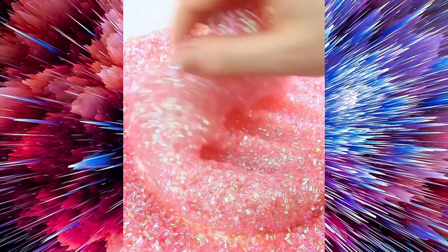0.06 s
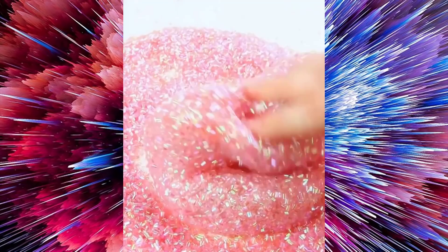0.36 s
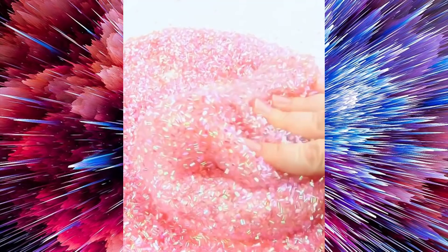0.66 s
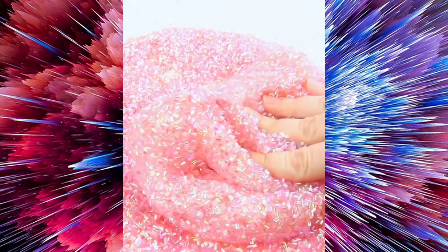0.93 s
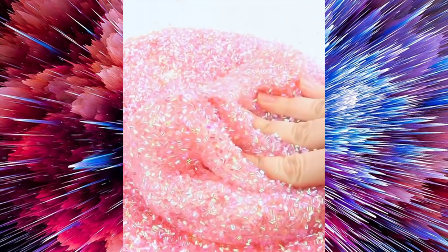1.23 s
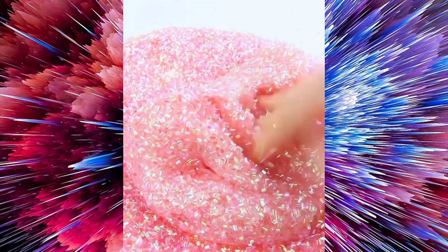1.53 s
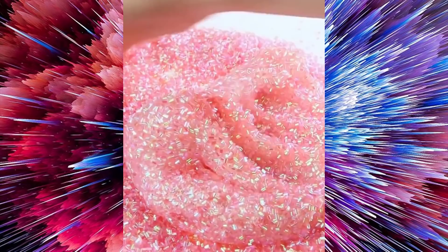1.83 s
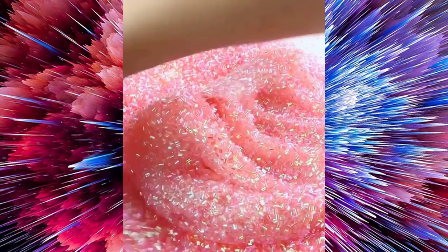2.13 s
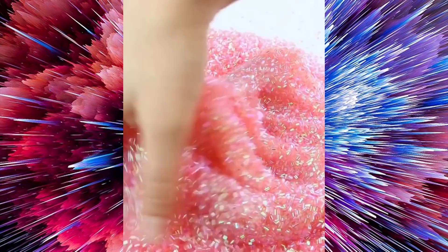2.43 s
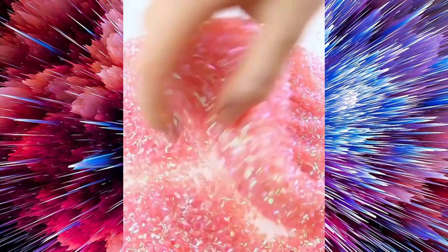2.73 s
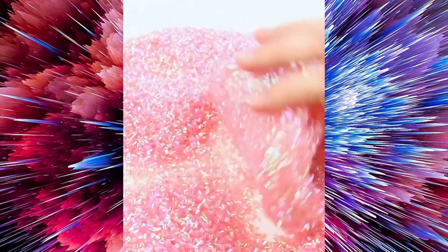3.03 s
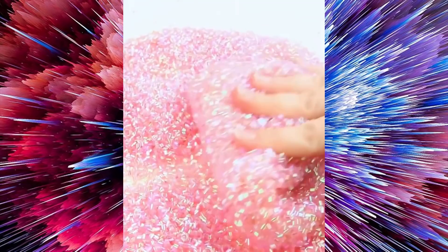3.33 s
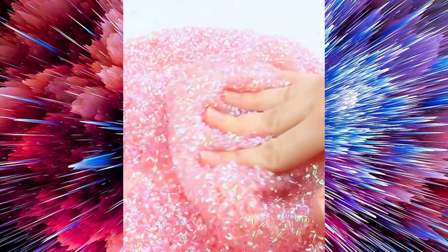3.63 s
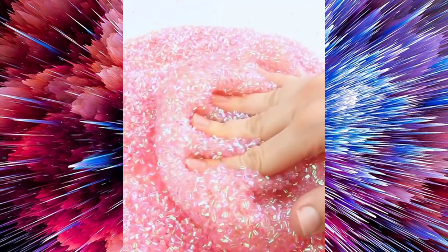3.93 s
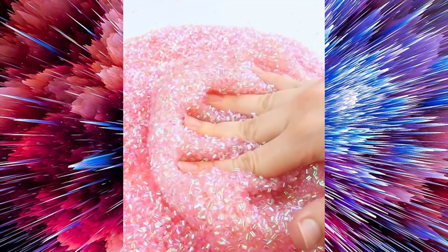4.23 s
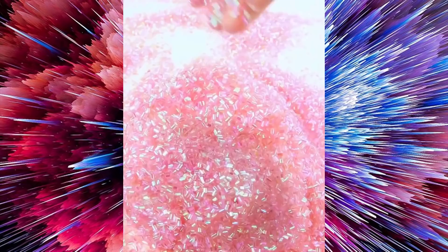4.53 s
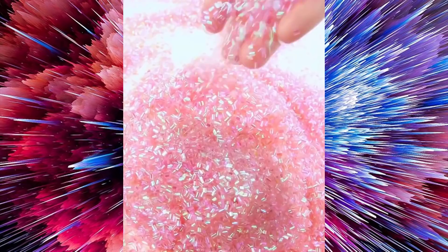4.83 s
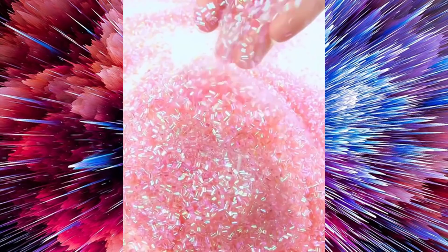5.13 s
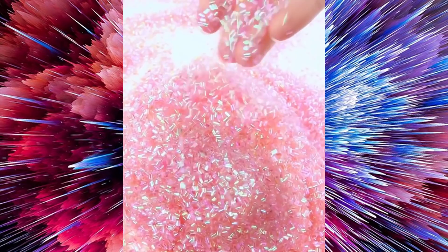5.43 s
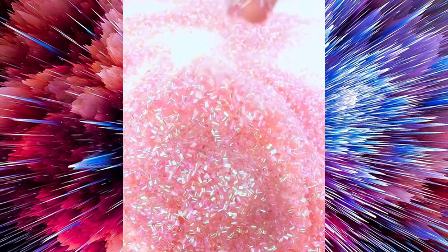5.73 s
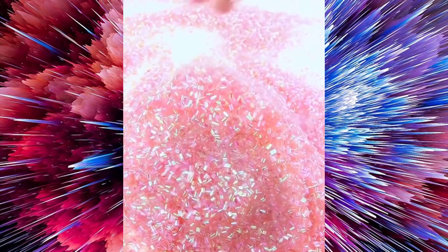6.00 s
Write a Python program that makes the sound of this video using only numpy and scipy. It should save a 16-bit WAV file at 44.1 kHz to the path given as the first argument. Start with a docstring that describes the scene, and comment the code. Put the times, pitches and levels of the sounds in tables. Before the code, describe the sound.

Close, dry stereo sound of slime being kneaded by hand. Countless tiny bubbles burst in a hissing crackle that rises and relaxes with each press, with one sharp snap standing out early on. Short sticky pulls and small wet pops come between the squeezes. After a soft, dull bump on the table, the fizz drops as strands stretch and tear, ending with another faint bump.

```python
"""Kneading glittery slime

A hand presses, folds and lifts slime close to a stereo microphone. Countless tiny air cells
tear open in a fizz, while larger ones crunch and squelch under the fingers. Thin strands rasp,
single films snap, air pockets pop, and the mass twice bumps softly on the table."""
import sys
import numpy as np
from scipy import signal
from scipy.fft import rfft, irfft, next_fast_len
from scipy.io import wavfile
from scipy.ndimage import uniform_filter1d, map_coordinates

SR = 44100
rng = np.random.default_rng(int(sys.argv[2]) if len(sys.argv) > 2 else 0)


def store_pcm(level_fs):
    """Save levels as 16-bit WAV."""
    pcm = np.round(np.clip(level_fs, -1, 1) * 32767).astype(np.int16)
    wavfile.write(sys.argv[1], SR, np.atleast_2d(pcm).T)


N = 271656


def amp(db):
    """Turn decibels into a gain to multiply by."""
    return 10 ** (np.asarray(db) / 20)


def unit(x):
    """Scale x to an average strength (rms) of 1."""
    return x / np.sqrt(np.mean(x ** 2) + 1e-20)


def wobble(rate):
    """A smooth curve through `rate` random values a second."""
    return map_coordinates(rng.standard_normal(int(N * rate / SR) + 4), [np.arange(N) * rate / SR])


def stereo_noise(size, shared=1, separate=0.5):
    """White noise: one part is the same in both ears, the other is each ear's own."""
    return shared * rng.standard_normal(size) + separate * rng.standard_normal((2, size))


def filtered(x, response):
    """Multiply each frequency in x by response(frequency)."""
    size = x.shape[-1]
    padded = next_fast_len(size + SR // 4)
    return irfft(rfft(x, padded) * response(np.fft.rfftfreq(padded, 1 / SR)), padded)[..., :size]


def coloured(x, spectrum):
    """Shape the tone of x with (frequency [Hz], level [dB]) points, then scale it to strength 1."""
    hz, db = np.transpose(spectrum)
    return unit(filtered(x, lambda f: amp(np.interp(np.log(f + 1), np.log(hz + 1), db))))


def resonance(hz, centre, width):
    """A filter curve that favours the frequencies near its centre."""
    return 1j * hz * width / (centre ** 2 - hz ** 2 + 1j * hz * width)


def ringing(t, hz, t60):
    """A tone that builds up over its first cycle and fades by 60 dB in t60 seconds."""
    return np.cos(2 * np.pi * hz * t) * (1 - np.exp(-2 * hz * t)) * amp(-60 * t / t60)


def panned(balance_db):
    """Left and right gains; a positive balance is louder on the left."""
    return amp(np.array([[.5], [-.5]]) * balance_db)


def add(track, s, sound):
    """Mix a stereo sound into the track at s seconds."""
    start = int(np.clip(round(s * SR), 0, N - 1))
    track[:, start:start + sound.shape[1]] += sound[:, :N - start]


def held(start, end, release_db_per_s=191):
    """Gain of a touch: the fingers quickly take hold, stay, then let go."""
    t = np.arange(N) / SR
    attack_db_per_s = 442
    drop_db = attack_db_per_s * np.maximum(start - t, 0) + release_db_per_s * np.maximum(t - end, 0)
    return amp(-np.minimum(drop_db, 100))


def patchy(x, depth_db):
    """Narrow peaks and dips come and go, so the tone keeps shifting."""
    spectra = signal.stft(x, nperseg=1024)[2]
    patches = uniform_filter1d(rng.standard_normal(spectra.shape[1:]), size=3, axis=0)
    patches = uniform_filter1d(patches, size=7, axis=1)
    swing = np.minimum(unit(patches), 1)  # peaks stay mild, so nothing whistles
    return unit(signal.istft(spectra * amp(depth_db * swing), nperseg=1024)[1][:, :N])


def gliding(x, ratios, drift=0.05):
    """Bend the pitch of x along (time [s], pitch [ratio]) points, with a little random drift."""
    speed = np.interp(np.arange(N) / SR, *np.transpose(ratios)) * np.exp(drift * wobble(9))
    return np.array([map_coordinates(side, [np.cumsum(speed)], order=1, mode="mirror") for side in x])


def echoes(x, t60):
    """A short blur of reflections whose pattern keeps changing as the hand moves."""
    hop = SR // 25
    t = np.arange(int(np.clip(t60, .002, .1) * SR)) / SR
    track = np.zeros((2, N))
    for start in range(0, N, hop):
        tail = rng.standard_normal((2, SR // 10))[:, :len(t)] * amp(-60 * t / t60)
        tail /= np.linalg.norm(tail, axis=1, keepdims=True)
        add(track, start / SR, signal.fftconvolve(x[:, start:start + hop], tail, axes=1))
    return track


def cells(spectrum, rate, spread_db, alike, t60):
    """About `rate` air cells burst each second; slime and hand briefly scatter their sound."""
    happens = rng.random(N) < rate / SR
    sizes = happens * amp(spread_db * np.minimum(rng.standard_normal(N), 2.5))
    bursts = sizes * stereo_noise(N, shared=np.sqrt(alike), separate=np.sqrt(1 - alike))
    return coloured(bursts + .5 * echoes(bursts, t60), spectrum)


def room_noise():
    """Steady faint noise, largely alike in both ears."""
    # the tone of the quiet room: (frequency [Hz], level [dB])
    room_tone = [(25, -22), (75, -23), (135, 0.5), (250, -2), (400, 0.5), (650, -1.5), (1100, -3),
                 (2000, -13), (5000, -16), (13000, -4)]
    return amp(-70.5) * coloured(stereo_noise(N), room_tone)


def table_rumble():
    """The hand shifts its weight and the table rumbles faintly."""
    # shoves that swell and fade: (middle [s], length [s], level [dB])
    shoves = [(0.06, 0.087, -80), (0.665, 0.06, -85), (1.028, 0.18, -82), (1.158, 0.065, -83),
              (1.626, 0.23, -81), (4.282, 0.11, -79)]
    t = np.arange(N) / SR
    force = sum(amp(db) * np.exp(-(2 * (t - s) / length) ** 2) for s, length, db in shoves)
    return force * coloured(stereo_noise(N), [(25, 0), (100, -7.5), (250, -8), (1000, -60)])


def finger_drag():
    """A buried finger rubs through the slime, low and muffled."""
    # the tone of the rubbing: (frequency [Hz], level [dB])
    rub_tone = [(120, -27), (260, -4.5), (450, -2.5), (620, -6), (900, 1), (1300, -5), (3000, -27)]
    # strokes deep in the mass: (start [s], end [s], level [dB])
    drags = [(0.0, 0.13, -70), (0.604, 0.79, -75), (1.603, 1.723, -67), (2.175, 2.737, -69.5),
             (5.18, 5.357, -74), (5.814, 5.876, -74)]
    force = sum(amp(db) * held(start, end) for start, end, db in drags)
    return force * coloured(stereo_noise(N), rub_tone)


def table_bumps():
    """The soft mass lands with a dull knock and a low puff of air."""
    # landings on the table: (time [s], relative level [dB])
    landings = [(4.56, -47.5), (6.145, -47)]
    # the tones in the knock: (pitch [Hz], relative level [dB], fade time [s])
    knock_tones = [(55, -9, .04), (111, -0.5, 0.05), (186, -1, 0.043), (343, -1.5, 0.041), (405, -2, 0.017)]
    track, t = np.zeros((2, N)), np.arange(SR // 10) / SR
    for s, db in landings:
        knock = sum(amp(level) * ringing(t, hz, t60) for hz, level, t60 in knock_tones)
        air = stereo_noise(len(t)) * amp(-60 * t / 0.075)
        puff = filtered(air, lambda f: resonance(f, 170, 600))
        add(track, s, amp(db - 5.5) * (knock / np.abs(knock).max() + .5 * puff / np.abs(puff).max()))
    return track


def tearing_strands():
    """Strands drawn thin tear in small rasping spurts, lower than the fizz."""
    # the tone of the rasp: (frequency [Hz], level [dB])
    rasp_tone = [(1000, -42), (4500, -18), (5500, 0), (6200, 3), (7000, -14), (9000, -30), (13000, -19)]
    # spells of tearing: (start [s], end [s], level [dB])
    tears = [(4.58, 4.86, -72), (5.603, 5.802, -60.5), (5.8, 5.958, -63)]
    rasp = coloured(stereo_noise(N, shared=0.5, separate=1), rasp_tone)
    force = np.max([amp(db) * held(start, end) for start, end, db in tears], axis=0)
    return rasp * force * amp(2.3 * wobble(50) + 1.4 * wobble(440))


def cupped_palm():
    """Cells bursting under the cupped hand sound through its hollow."""
    # air squeezed under the palm: (start [s], end [s], level [dB], fading [dB/s])
    squeeze = (3.19, 4, -61.5, 6)
    # the tone of the hollow: (frequency [Hz], level [dB])
    palm_tone = [(700, -40), (980, -3), (1180, 3), (1350, -2), (1600, -16), (2500, -45)]
    # the hollow widens as the fingers spread: (time [s], pitch [ratio])
    palm_pitch = [(3.199, 1.02), (3.8, .95)]
    start, end, db, fading = squeeze
    hollow = gliding(cells(palm_tone, rate=2500, spread_db=0.5, alike=0.87, t60=.04), palm_pitch)
    elapsed = np.maximum(np.arange(N) / SR - start, 0)
    return amp(db - fading * elapsed) * hollow * held(start, end)


def pocket_pops():
    """An air pocket opens with a wet smack and rings briefly above a lower, hollow knock; the mass landing on
    the table rings the same way once."""
    # air pockets, and at 4.562 s the ring of the mass landing on the table: # (time [s], relative level [dB],
    # ring pitch [Hz], smack bandwidth [times pitch], # relative ring level [dB], fade time [s], relative knock
    # level [dB], balance [dB])
    pockets = [(1.0440, -35, 1550, 0.65, -4, 0.02, -11.5, -1), (1.0790, -35, 1700, 0.56, -6, .025, -26, -2),
               (1.1555, -32.5, 1600, 0.76, -5.5, 0.026, -17, -6),
               (3.2200, -40, 1140, .5, -4, 0.039, -28, -8), (3.428, -33, 2900, .6, -12, .012, -26, 1),
               (3.462, -25.5, 2940, 0.35, -3, 0.024, -44, 1),
               (4.2415, -27.5, 1997, 0.9, -22, 0.017, -40, 4), (4.289, -37, 2200, 1, -14, 0.011, -27, -10),
               (4.383, -34, 1410, 1.5, -20, 0.012, -37, -4), (4.3060, -28, 2300, 0.78, -18, .014, -36, 3),
               (4.543, -29, 2120, 1.3, -19, .018, -39, -1), (4.5620, -37, 1190, 1.1, -6, 0.048, -25, -1),
               (5.1656, -35.5, 1740, 1.04, -14, 0.033, -28, -6),
               (5.3873, -35, 1550, 0.73, -3.5, 0.029, -22, -6.5),
               (5.6165, -35.5, 1560, 0.9, -7, 0.037, -14.5, -4),
               (5.6440, -33, 1700, 1.7, -18, 0.029, -21, -2),
               (5.714, -34.5, 1597, 0.81, -7.5, 0.085, -6.5, -3.5),
               (5.8153, -37, 1557, 1.3, -8.5, 0.056, -15.5, -4)]
    ear_delay_s = np.array([[0.00066], [0]])  # the sound reaches the left ear later
    track, t = np.zeros((2, N)), np.arange(SR // 12) / SR
    for s, db, hz, width, ring_db, t60, knock_db, balance_db in pockets:
        air = (t == 0) + 0.1 * amp(-60 * t / t60) * rng.standard_normal((2, len(t)))
        smack = filtered(air, lambda f: resonance(f, 1.154 * hz, width * hz) ** 2 / (1 + (f / 4200) ** 6))
        ring = ringing(t, hz, t60) + amp(-11) * ringing(t, 1.57 * hz, t60)
        hollow = filtered(air, lambda f: resonance(f, 490, 310) ** 2)
        knock = 0.52 * ringing(t, hz=409, t60=0.06) + hollow / np.abs(hollow).max()
        pop = smack / np.abs(smack).max() + amp(ring_db - 3.0) * ring + amp(knock_db) * knock
        pop = filtered(pop, lambda f: np.exp(-2j * np.pi * f * ear_delay_s))
        add(track, s, amp(db - 4.5) * panned(balance_db) * pop)
    return track


def film_snaps():
    """A large film breaks in one sharp swing, a small one in a flurry. Thin films give little bass."""
    # films: (time [s], relative level [dB], pitch [Hz], bandwidth [times pitch], balance [dB])
    films = [(0.0543, -26, 8160, 1.1, -4), (0.0936, -25, 8000, 0.87, 1), (0.7805, -28, 8000, .9, -2),
             (0.8668, -5.5, 7600, 1.7, -7), (0.984, -23, 8400, 0.82, -2), (1.109, -26, 8100, 1, 0),
             (1.205, -27, 8160, 0.85, -4), (1.2688, -29.5, 8060, 0.73, 2), (1.4078, -37, 8700, 1.4, 4),
             (1.527, -33, 3380, 1.2, -5), (1.5619, -13, 9100, 1.3, -6), (3.337, -26, 8700, 0.49, 0),
             (3.3463, -27, 5760, 0.89, -9), (3.4708, -20.5, 8500, 0.34, -5), (4.0697, -27, 8500, 1, -2),
             (4.252, -24.5, 9000, 0.62, -3), (4.3036, -24.5, 6140, 2, -1), (4.712, -34, 8400, 0.63, -5),
             (4.787, -30, 8000, 1.8, -5), (4.8098, -25.5, 8200, 2.1, -7), (4.8313, -32.5, 9700, 0.49, -6),
             (4.864, -31, 8600, 1.2, -7), (6.0635, -28, 8700, 0.85, 9)]
    track, t = np.zeros((2, N)), np.arange(SR // 40) / SR
    for s, db, hz, width, balance_db in films:
        flurry = np.interp(db, [-24, -10], [.35, .08])
        rattle = flurry * (amp(-60 * t / .007) + .16 * amp(-60 * t / .025))
        tear = (t == 0) + rattle * rng.standard_normal((2, len(t)))
        film = lambda f: resonance(f, hz, width * hz) ** 2 * resonance(f, 2700, 2400) * 1j * f / 2400
        snap = filtered(tear, lambda f: film(f) + 0.012 * resonance(f, 250, 900))
        add(track, s, amp(db - 1.5) * panned(balance_db) * snap / np.abs(snap).max())
    return track


def press(start, peak, end, swell_db, relax_db_per_s):
    """Gain of a press: it swells to its peak, then relaxes as the air is used up."""
    t = np.arange(N) / SR
    shape_db = np.interp(t, [start, peak], [-swell_db, 0]) - relax_db_per_s * np.maximum(t - peak, 0)
    return amp(shape_db) * held(start, end, release_db_per_s=342)  # stops sooner than a pull


def hand_moves():
    """Gains of fizz (stereo), crunch and squelch: settling, stretching, pulls and presses add in power."""
    # slime left to settle: (fizz [dB], crunch [dB], squelch [dB])
    settling = (-59.5, -70, -69.5)
    # the lifted mass stretches under its own weight, ever louder:
    # (start [s], fizz [dB], crunch [dB], squelch [dB], growth [dB/s])
    stretch = (5, -54.5, -69.5, -81, 2.5)
    # slime peels from skin or table: (start [s], length [s], fizz [dB], crunch [dB], squelch [dB])
    pulls = [(0.0, 0.31, -46.5, -60.5, -60), (0.068, 0.048, -46.5, -52.5, -80),
             (0.987, 0.096, -48, -76, -60), (1.552, 0.14, -40.5, -50, -56), (1.613, 0.018, -43, -48.5, -58),
             (2.368, 0.04, -43.5, -51, -65), (2.467, 0.027, -46.5, -52, -72),
             (2.597, 0.33, -48.5, -58, -79), (2.718, 0.048, -46, -67, -67), (3.043, 0.028, -52, -51, -59),
             (3.442, 0.044, -45, -51, -64), (4.028, 0.02, -52, -55, -85), (4.238, 0.017, -49.5, -55, -71),
             (4.529, 0.01, -49.5, -60, -61), (4.63, 0.11, -58, -73, -87), (4.847, 0.12, -55, -70, -90),
             (5.596, 0.15, -56.5, -60, -63.5), (6.019, 0.046, -47.5, -80, -77)]
    # slow presses; tiny surface cells give way first, larger ones at full depth:
    # (start [s], most fizz [s], full depth [s], release [s], fizz [dB], crunch [dB], squelch [dB],
    # squelch swell [dB], relaxing of crunch and squelch [dB/s], balance [dB])
    presses = [(0.289, 0.638, 0.75, 1.48, -43.5, -50, -55, 9, 13, -1.5),
               (1.925, 2.436, 2.48, 3.1, -46, -55, -56.5, 13, 21.5, -3.5),
               (2.952, 3.125, 3.2, 4.56, -42, -50.5, -54, 12.5, 5, -1.7)]
    t = np.arange(N) / SR
    lifted, *stretch_db, growth = stretch
    moves = [(np.ones(N), settling), (held(lifted, t[-1]) * amp(growth * (t - lifted)), stretch_db)]
    for start, length, *levels in pulls:
        sag = amp(-5 * np.maximum(t - start, 0))  # a pull weakens by 5 dB a second
        moves.append((sag * held(start, start + length), levels))
    fizz, crunch, squelch = sum((amp(levels)[:, None] * gain) ** 2 for gain, levels in moves)
    fizz = fizz * panned(-0.8) ** 2
    for start, early, deep, end, fizz_db, crunch_db, squelch_db, swell_db, relax, balance_db in presses:
        surface = press(start, early, end, 0.17 * swell_db, relax_db_per_s=11)
        fizz += (amp(fizz_db) * panned(balance_db) * surface) ** 2
        crunch += (amp(crunch_db) * press(start, deep, end, 0.83 * swell_db, relax)) ** 2
        squelch += (amp(squelch_db) * press(start, deep, end, swell_db, relax)) ** 2
    return np.sqrt(fizz), np.sqrt(crunch), np.sqrt(squelch)


def kneading():
    """Tiny cells fizz, larger ones crunch and squelch in clumps, and a few sticky ones tick singly."""
    # the tones of the four kinds of bursting cell: (frequency [Hz], level [dB])
    fizz_tone = [(300, -58), (900, -20.5), (2500, -16.5), (4800, -10.5), (6500, -4), (8500, 0),
                 (10500, -1.5), (12800, -4), (14000, -27)]
    crunch_tone = [(500, -50), (1500, -8.5), (2300, -2), (3000, 0.5), (3900, 0), (5000, -7), (7000, -6.5),
                   (13000, -19)]
    squelch_tone = [(50, -58), (150, -28.5), (380, -11.5), (620, -9), (850, -3), (1150, 0), (1700, -1),
                    (2300, -7.5), (3300, -4), (8000, -15)]
    sticky_tone = [(400, -24), (1100, -1), (1800, -2.5), (3200, -1.5), (6000, -18)]
    # larger cells sound lower: (time [s], pitch [ratio])
    crunch_pitch = [(0.799, 1.012), (2.5, 0.96), (3.45, 1.02), (4.4, .84), (5.4, 1.05)]
    fizz_gain, crunch_gain, squelch_gain = hand_moves()
    clumps = wobble(40)  # one flutter in loudness that fizz, crunch and squelch share
    fizz = patchy(cells(fizz_tone, rate=17000, spread_db=0.5, alike=0.051, t60=0.0079), depth_db=2.4)
    crunch = patchy(cells(crunch_tone, rate=6000, spread_db=1.0, alike=0.56, t60=0.045), depth_db=4)
    crunch = gliding(crunch, crunch_pitch)
    squelch = patchy(cells(squelch_tone, rate=3500, spread_db=0.0, alike=0.72, t60=0.061), depth_db=1)
    fizz *= fizz_gain * amp(0.93 * clumps + 0.094 * wobble(220))
    crunch *= crunch_gain * amp(0.78 * clumps + 0.92 * wobble(30))
    squelch *= squelch_gain * amp(1.5 * clumps + 0.39 * wobble(50))
    sticky = amp(-8) * squelch_gain * cells(sticky_tone, rate=130, spread_db=1.5, alike=0.65, t60=.02)
    return fizz + crunch + squelch + sticky


def scene():
    """The slime, heard close and with little echo, coloured by its hollow-sounding surroundings."""
    # resonances of the surroundings: (pitch [Hz], bandwidth [Hz], relative strength [dB])
    hollows = [(263, 7.6, -3), (373.5, 25, 7), (464, 15, 6.5), (1115, 6.3, 6.5)]
    slime = kneading() + cupped_palm() + tearing_strands() + finger_drag()
    slime = slime + film_snaps() + pocket_pops() + table_bumps()
    mix = slime + amp(-15) * echoes(slime, t60=0.11) + table_rumble() + room_noise()
    boost = lambda f: sum(amp(db - 2.5) * resonance(f, hz, width) for hz, width, db in hollows)
    return filtered(mix, lambda f: 1 + boost(f))


def record(dry):
    """The very highest treble is cut off steeply."""
    top_hz = 13700
    return filtered(dry, lambda hz: 1 / np.sqrt(1 + (hz / top_hz) ** 130))


dry = scene()
out = record(dry)
store_pcm(out)
```